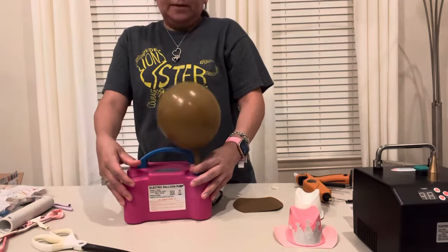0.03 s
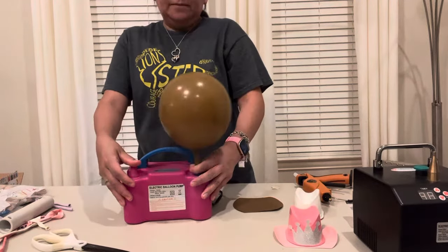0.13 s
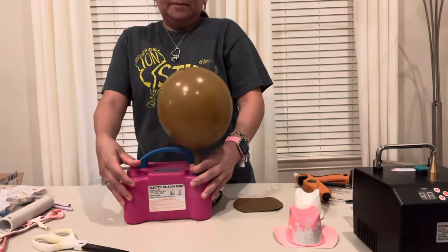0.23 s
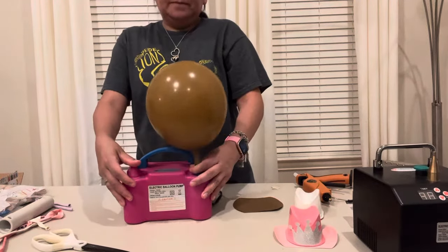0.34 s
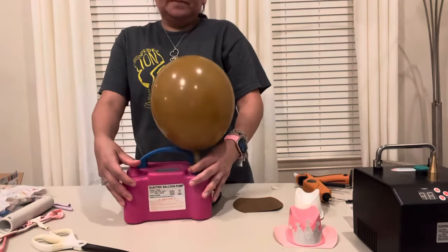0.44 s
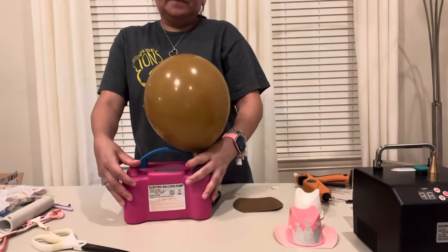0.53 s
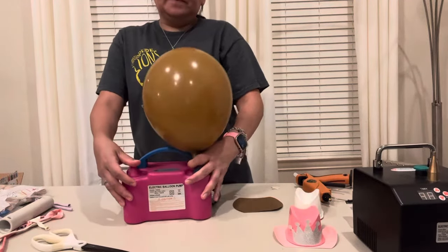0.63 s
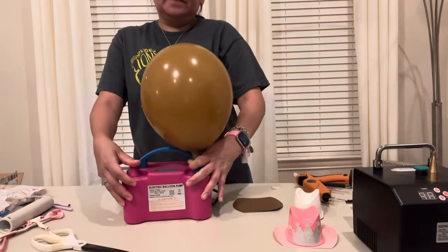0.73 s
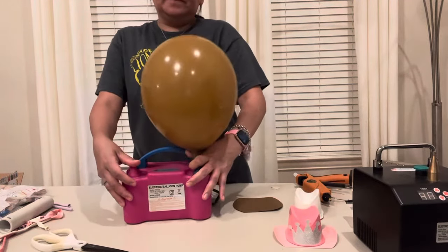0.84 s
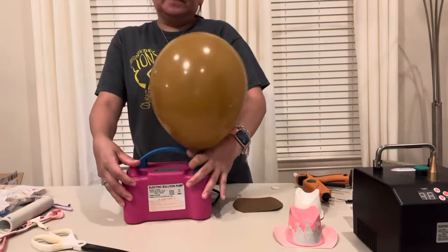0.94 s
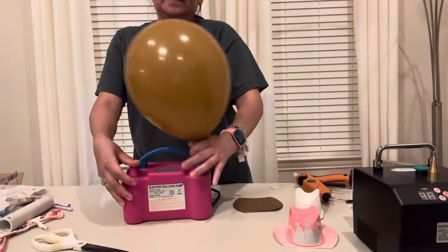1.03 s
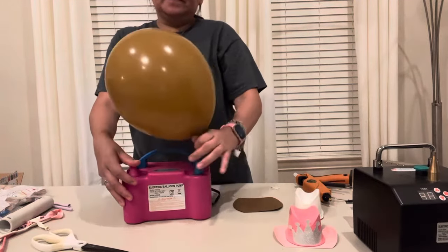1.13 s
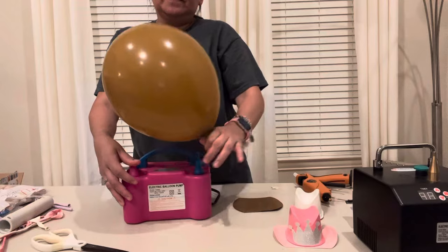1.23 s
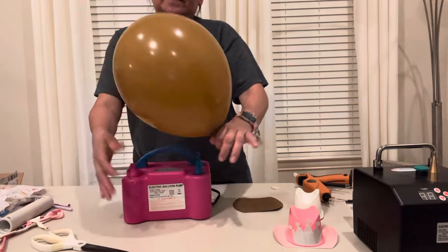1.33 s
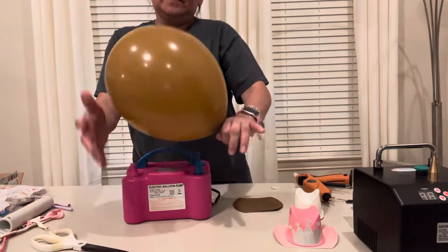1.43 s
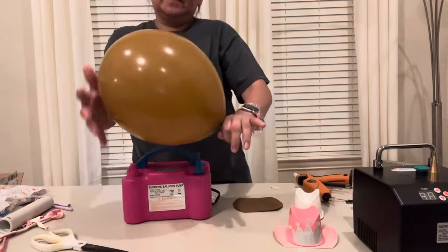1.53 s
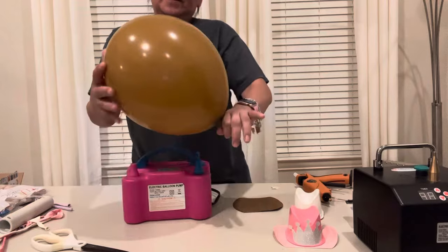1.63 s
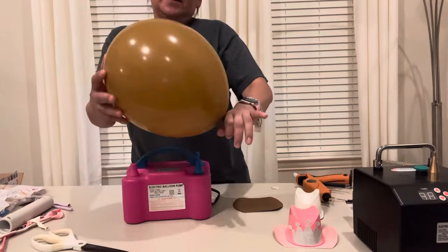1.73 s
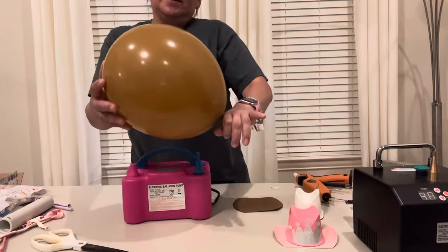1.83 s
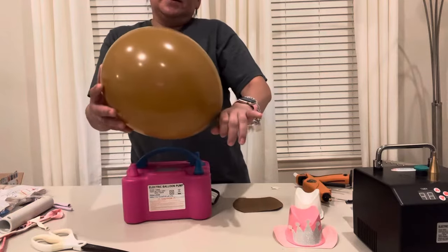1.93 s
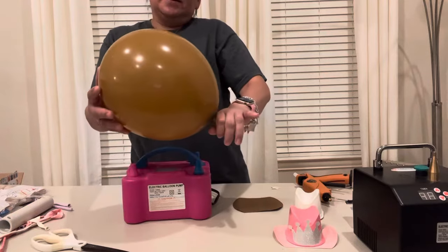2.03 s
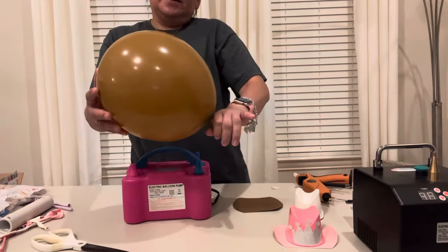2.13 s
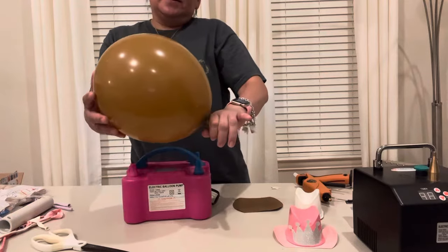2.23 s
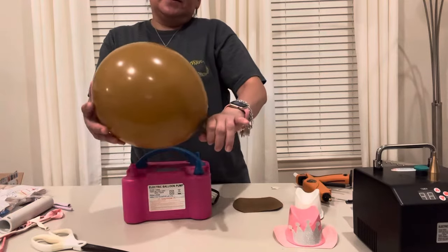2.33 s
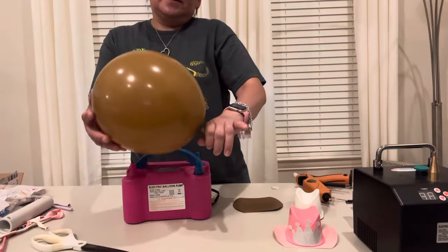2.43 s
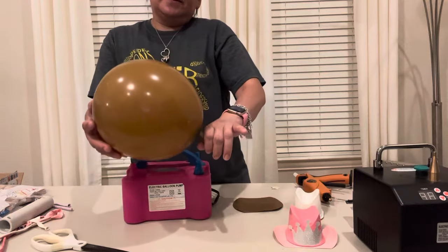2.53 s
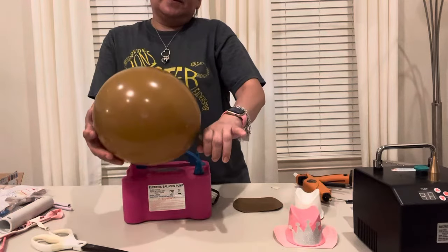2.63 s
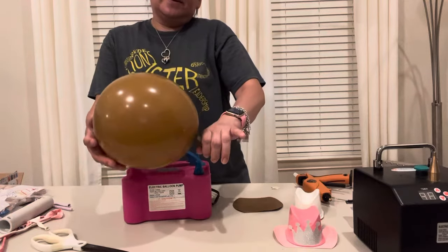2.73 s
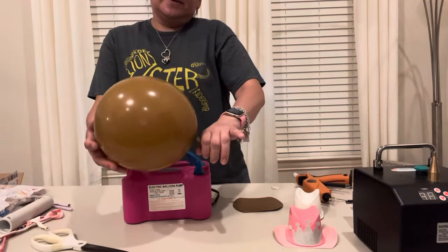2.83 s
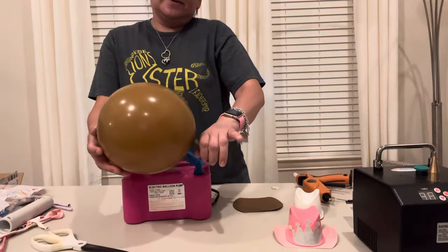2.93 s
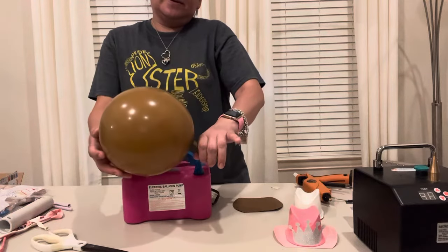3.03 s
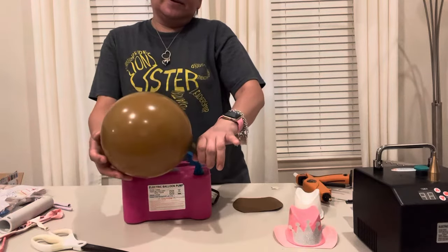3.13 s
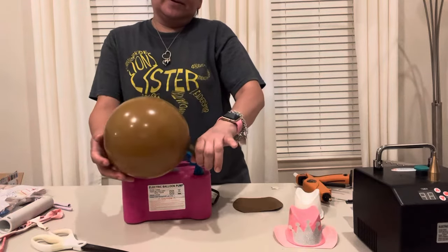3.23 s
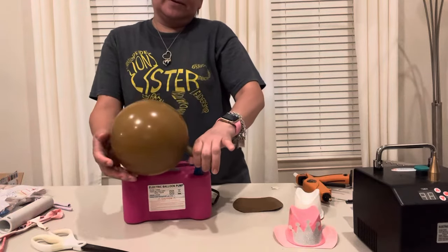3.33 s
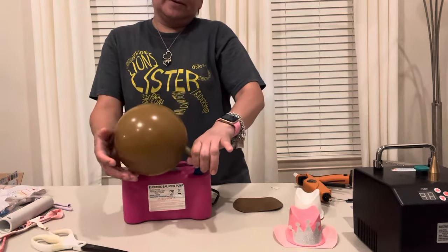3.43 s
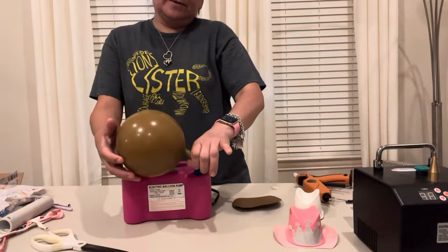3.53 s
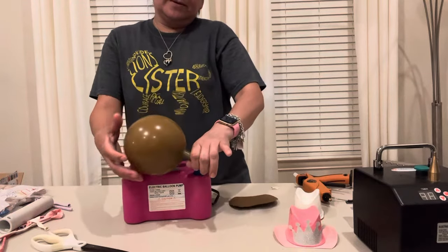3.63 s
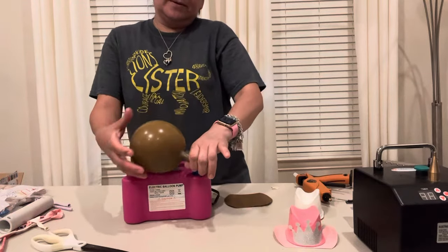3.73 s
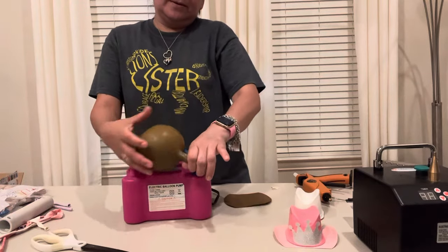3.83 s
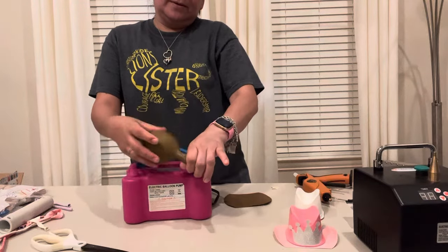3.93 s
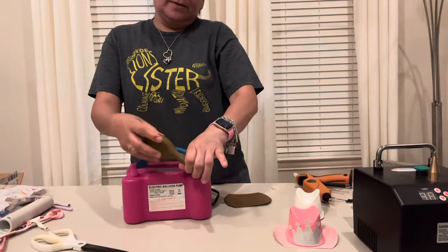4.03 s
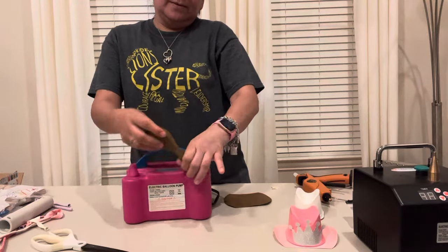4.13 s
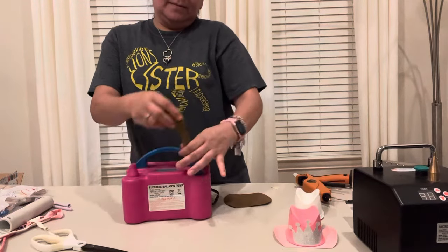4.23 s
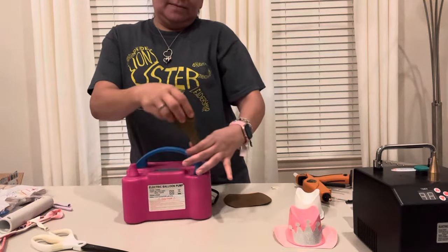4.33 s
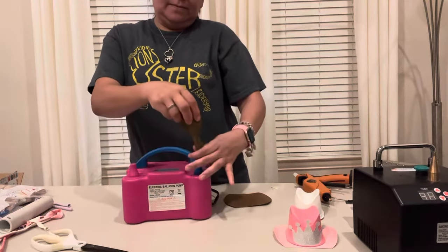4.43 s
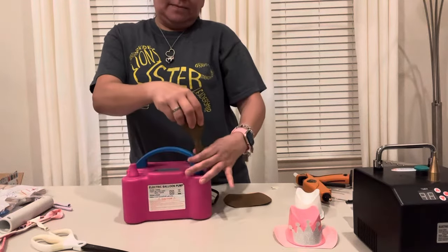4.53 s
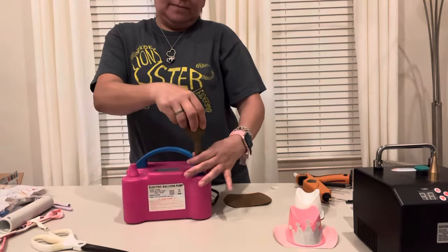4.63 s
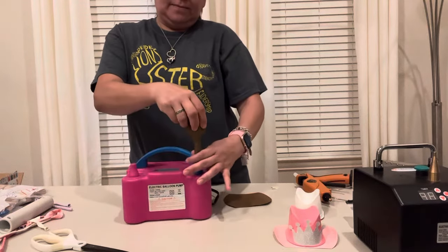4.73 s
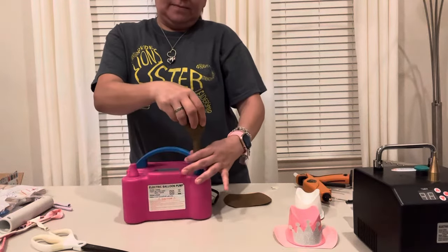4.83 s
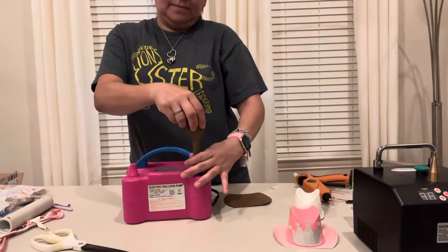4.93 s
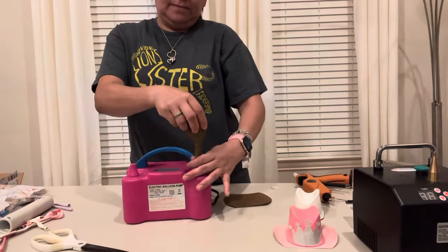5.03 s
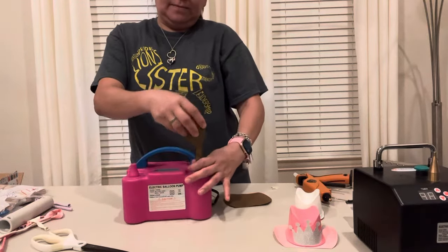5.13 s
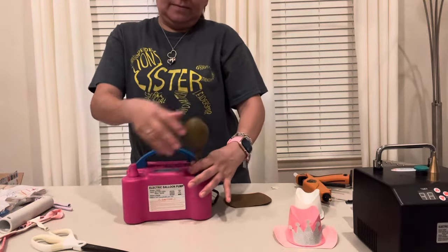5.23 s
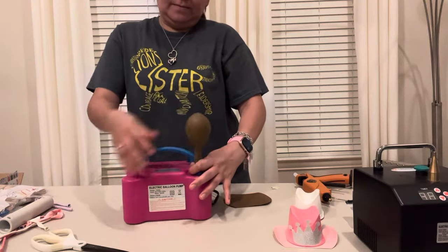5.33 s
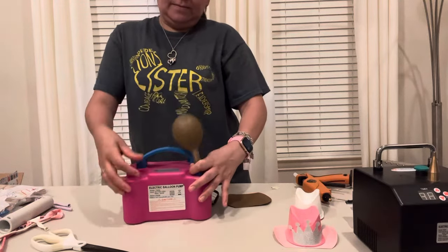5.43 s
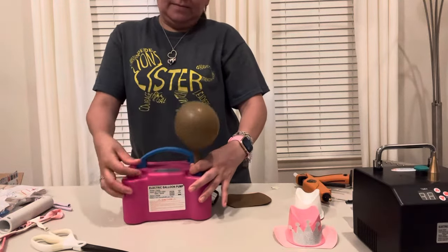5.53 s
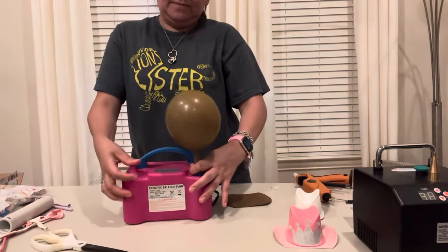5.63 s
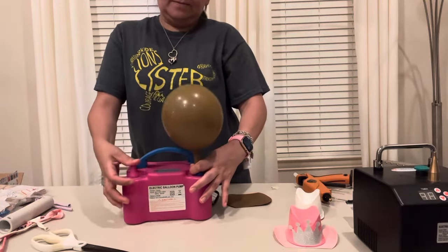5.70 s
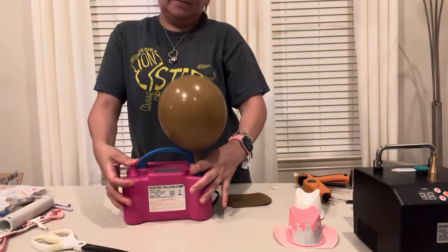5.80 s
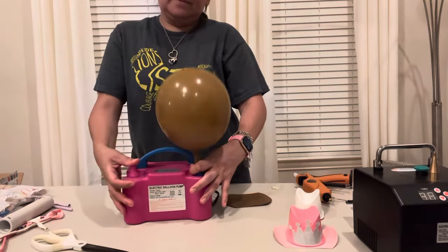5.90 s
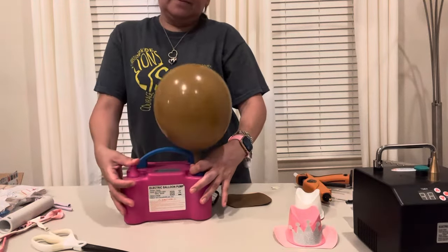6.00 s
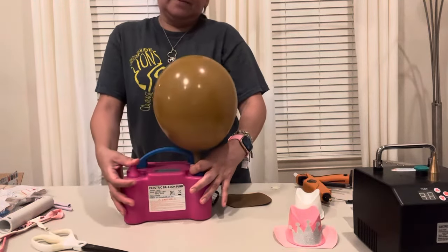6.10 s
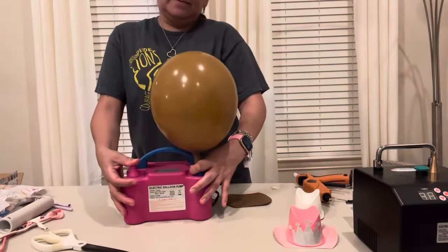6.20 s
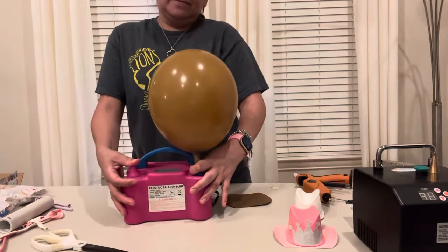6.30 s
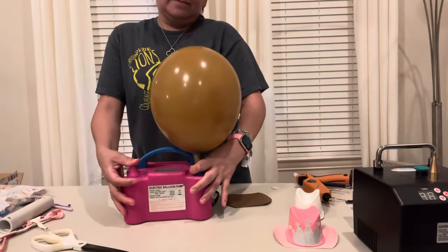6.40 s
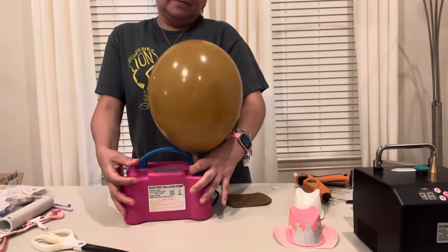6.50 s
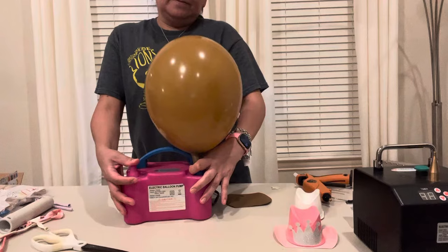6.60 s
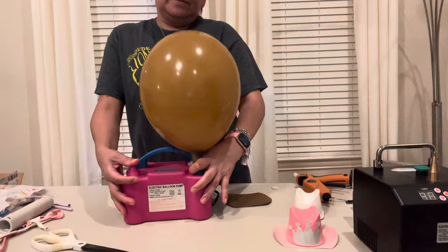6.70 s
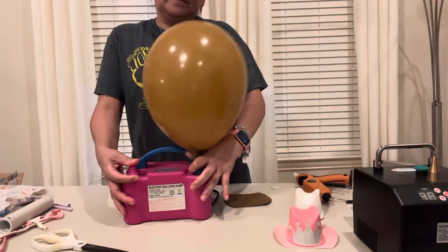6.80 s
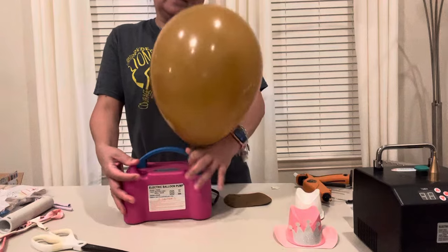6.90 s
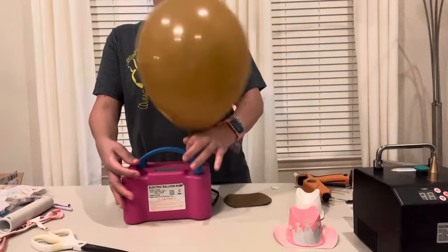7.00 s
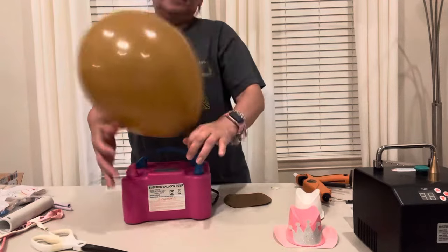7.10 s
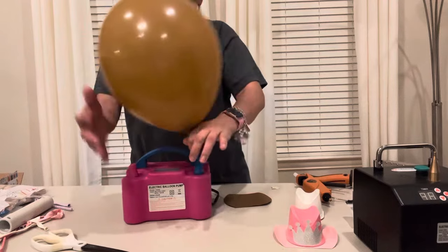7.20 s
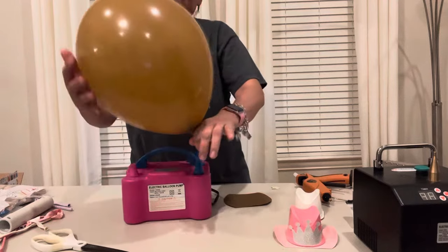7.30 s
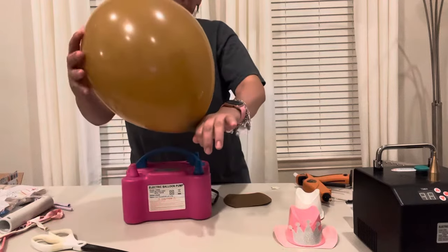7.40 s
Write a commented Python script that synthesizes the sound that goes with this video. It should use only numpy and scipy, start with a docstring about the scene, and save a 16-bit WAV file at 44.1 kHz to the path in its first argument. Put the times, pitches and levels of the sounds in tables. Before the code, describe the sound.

An electric pump whines and inflates a balloon; air rasps out of its fluttering neck, then the pump restarts and fills it again.

```python
"""In a curtained room, a mains-driven pump on a table blows up a balloon.
Its rotor whines, coasts down and is started again. Air roars in the casing and rushes through the
nozzle. Let go, the balloon empties through its fluttering rubber neck. The balloon also hoots, air
puffs from the neck, and hands bump softly against the table or the balloon."""
import sys
import numpy as np
from scipy import signal
from scipy.fft import rfft, irfft, next_fast_len
from scipy.io import wavfile
from scipy.ndimage import uniform_filter1d

SR = 44100
rng = np.random.default_rng(int(sys.argv[2]) if len(sys.argv) > 2 else 0)


def waveform_to_disk(signal):
    """Save audio, clipped to [-1, 1], as 16-bit WAV at the path in sys.argv[1]."""
    frames = np.transpose(np.atleast_2d(signal))
    scaled = np.clip(frames, -1, 1) * 32767
    samples = np.round(scaled).astype(np.int16)
    wavfile.write(sys.argv[1], SR, samples)


N = 328839
TIME = np.arange(N) / SR
# When the pump's switch is held. Each row: on and off time in seconds.
SWITCH_TIMES = [(-1, .461), (5.165, 6.847)]


def from_db(db):
    """Turn decibels into a gain."""
    return 10 ** (np.asarray(db) / 20)


def rms_one(x):
    """Scale a signal to an average strength (rms) of 1."""
    return x / np.sqrt(np.mean(x ** 2) + 1e-20)


def in_time(rows):
    """Join rows that begin with a time into one curve for each other column."""
    seconds, *columns = np.transpose(rows)
    return [np.interp(TIME, seconds, column) for column in columns]


def at_hz(points, hz):
    """Read a table of levels in dB at the given frequencies."""
    known_hz, db = np.transpose(points)
    return np.interp(np.log(hz), np.log(known_hz), db)


def gate(start, end, fade_s):
    """Fade in from the start, hold at 1, fade out to the end."""
    return np.clip(np.minimum(TIME - start, end - TIME) / fade_s, 0, 1)


def drift(rate_hz):
    """A smooth random wobble, about 1 in size."""
    steps = rng.standard_normal(int(N / SR * 200) + 2)
    pole = np.exp(-2 * np.pi * rate_hz / 200)
    slow = rms_one(signal.lfilter([1], [1, -2 * pole, pole * pole], steps))
    return np.interp(TIME * 200, np.arange(len(slow)), slow)


def tone(hz):
    """A sine wave that follows a pitch curve."""
    return np.sqrt(2) * np.sin(2 * np.pi * np.cumsum(hz) / SR + rng.uniform(0, 2 * np.pi))


def at_ports(x):
    """Sound reaches the microphone's left opening (port) two samples after the right."""
    return np.array([np.roll(x, 1), np.roll(x, -1)])


def shaped_noise(*spectra):
    """Noise coloured by tables of levels and by the ringing of the pump's casing."""
    # Casing resonances. Each row: centre in Hz, width in Hz, boost in dB.
    casing = [(750, 45, 3), (4730, 11, 8.5)]
    size = next_fast_len(N)
    hz = np.arange(size // 2 + 1) * SR / size + 1
    db = sum(at_hz(spectrum, hz) for spectrum in spectra)
    db += sum(boost / (1 + ((hz - centre) / width) ** 2) for centre, width, boost in casing)
    return irfft(rfft(rng.standard_normal(size)) * from_db(db), size)[:N]


def wide_noise(spectrum, flicker_db):
    """Stereo noise: direct sound plus a scattered part, opposite in left and right."""
    # Each row: frequency in Hz, scattered level in dB relative to direct.
    spread = [(60, -22.5), (380, -6.5), (2380, -3.5), (15000, -28)]
    direct, scattered = shaped_noise(spectrum), shaped_noise(spectrum, spread)
    stereo = (at_ports(direct) + scattered * [[1], [-1]]) / np.std(direct)
    return stereo * from_db(flicker_db * drift(20))


def turbulence(x, depth_db):
    """Swirling air swells and thins in patches of pitch and time."""
    patch_hz, patch_s = 260.7, .09
    spectrum = signal.stft(x, nperseg=1024)[2]
    patches = rng.standard_normal(spectrum.shape[-2:])
    for axis, cells in enumerate((patch_hz * 1024 / SR, patch_s * SR / 512)):
        patches = uniform_filter1d(uniform_filter1d(patches, int(cells), axis=axis), 3, axis=axis)
    return signal.istft(spectrum * from_db(depth_db * rms_one(patches)), nperseg=1024)[1][..., :N]


def still_room():
    """The faint, low noise of the room itself."""
    # Each row: frequency in Hz, relative level in dB.
    colour = [(30, -14), (65, -2.5), (108, -12.5), (230, -4), (724, -25), (1150, -30.5), (1450, -49),
              (8800, -41), (10000, -85)]
    return from_db(-61) * wide_noise(colour, flicker_db=0.94)


def room_echo(x):
    """Reflections blur into a short tail on each side, without deep bass."""
    t60_s = 0.58   # time to fade by 60 dB
    age = np.arange(int(.5 * SR)) / SR
    tail = rng.standard_normal((2, len(age))) * from_db(-60 * age / t60_s) * (age > .004)
    tail = signal.sosfilt(signal.butter(2, 350, "high", fs=SR, output="sos"), tail)
    tail /= np.sqrt(np.sum(tail ** 2, axis=1, keepdims=True))
    return from_db(-6) * signal.fftconvolve(x[None], tail, axes=1)[:, :N]


def hand_bumps():
    """Hands knock the table or balloon with soft, low thuds."""
    # Each row: start in seconds, level in dB, pitch in Hz.
    bumps = [(5.469, -32.5, 99), (7.105, -26, 60), (7.272, -27, 71)]
    out = np.zeros(N)
    for start, db, hz in bumps:
        age = np.clip(TIME - start, 0, 2)
        out += from_db(db - 60 * age / 0.15) * np.clip(age / 0.015, 0, 1) * np.sin(2 * np.pi * hz * age)
    return out


def puffs_and_click():
    """Sharp puffs of air from the neck, and a faint click as the pump is switched on."""
    # Each row: start in seconds, level in dB, centre in Hz, seconds to rise, seconds to fade by 60 dB.
    bursts = [(0.984, -16, 3940, 0.014, 0.33), (1.012, -24, 4200, 0.014, 0.32),
              (3.89, -33, 920, 0.022, 0.47), (5.167, -44, 928, 0.0025, 0.47),
              (6.881, -15.5, 4720, 0.008, 0.23), (6.897, -22, 3600, 0.0076, 0.47),
              (7.0, -25, 6000, 0.02, 0.15)]
    out = np.zeros((2, N))
    for start, db, hz, rise, t60 in bursts:
        age = np.clip(TIME - start, 0, 2)
        colour = [(hz / 9, -45), (hz / 2, -17), (hz / 1.11, -9), (hz, 0), (hz * 1.37, -8),
                  (8900, -14), (9900, -60)]
        fall_db = -60 * np.maximum(age - rise, 0) / t60
        body, snap = from_db(fall_db), from_db(-1.5 + fall_db / 0.3)
        out += from_db(db) * (body + snap) * np.clip(age / rise, 0, 1) ** 2 * wide_noise(colour, 0)
    return out


def neck_flutter():
    """Escaping air flaps the neck and rasps through it; a slack, low neck flaps more unevenly and rasps louder."""
    # One list for each flutter. Each row: time in seconds, pitch in Hz, level in dB.
    flutters = [
        [(1.69, 238.2, -33), (1.88, 248.6, -33), (1.94, 433, -24), (1.99, 447.5, -34), (2.035, 675, -52),
         (2.1, 656.5, -41.5), (2.26, 353.7, -30), (2.4, 347.5, -32.5), (2.53, 396.4, -32), (2.62, 362.5, -29)],
        [(2.82, 410.4, -36.5), (3.3, 396, -30)],
        [(3.895, 480, -37), (3.93, 400.6, -30), (4.0, 395.6, -46), (4.14, 400, -72)],
    ]
    # Each row: upper levels in dB of one flutter's second and third harmonic, before any boost.
    overtones = [(-41, -47), (-45, -53), (-44, -48)]
    # Each row: frequency in Hz, relative level in dB.
    rasp_colour = [(120, -34), (250, 13), (450, 8), (900, 8), (2000, -3), (3000, -46)]
    taut_hz, taut_boost_db = 520, 12   # above this pitch the taut neck brings out the third harmonic
    out, rasp = np.zeros(N), rms_one(shaped_noise(rasp_colour))
    for rows, limits_db in zip(flutters, overtones):
        hz, db = in_time(rows)
        uneven = np.clip(0.363 * (347 / hz) ** 0.82, 0, 1)
        phase = 2 * np.pi * np.cumsum(hz * (1 + (.014 + .055 * uneven) * drift(40))) / SR
        levels = [db, *(np.minimum(limit, db + 5) for limit in limits_db)]
        levels[2] += taut_boost_db * np.clip(2 * (hz / taut_hz - 1), 0, 1)
        flaps = sum(from_db(level + (3.5 + 3 * uneven) * drift(45)) * np.sin(k * phase)
                    for k, level in enumerate(levels, 1))
        rasp_part = uneven * rasp * from_db(np.minimum(db, -33))
        out += gate(rows[0][0], rows[-1][0], 0.0095) * (flaps + rasp_part)
    return out


def balloon_hoots():
    """The balloon's skin sounds short, wavering notes."""
    # Each row: start in seconds, length in seconds, pitch in Hz, level in dB.
    hoots = [(0.11, 0.062, 311, -27.5), (0.374, 0.15, 372, -32), (3.661, 0.12, 345, -46),
             (5.926, 0.13, 442.1, -33.5), (6.15, 0.13, 462, -27.5), (6.53, 0.18, 531.4, -30.5)]
    out = np.zeros(N)
    for start, length, hz, db in hoots:
        swell = from_db(db + 3 * drift(20)) * gate(start, start + length, 0.031)
        out += swell * tone(hz * (1 + 0.014 * drift(32)))
    return out


def noise_band(hz, width_hz=450):
    """A narrow band of noise around a moving centre."""
    slow = signal.sosfilt(signal.butter(2, width_hz / 2, fs=SR, output="sos"), rng.standard_normal((2, N)))
    phase = 2 * np.pi * np.cumsum(hz) / SR
    return rms_one(slow[0] * np.cos(phase) + slow[1] * np.sin(phase))


def inlet_whistle():
    """Air entering the balloon stirs two breathy resonances of nozzle and neck."""
    # One list for each fill. Each row: time in seconds, low pitch in Hz, its level in dB,
    # high pitch in Hz, its level in dB.
    whistles = [
        [(0.0, 2689, -32, 4000, -32), (0.25, 2500, -30, 4050, -25), (0.45, 3000, -25, 4250, -25.5),
         (0.8, 2970, -44, 4207, -39)],
        [(5.6, 3150, -25, 4350, -32), (5.69, 2650, -27, 4163, -22.5), (5.86, 2800, -25.5, 3874, -23),
         (6.1, 3050, -26, 4240, -21.5), (6.22, 3000, -34, 4210, -28), (6.38, 3500, -29.5, 4335, -20),
         (6.75, 3400, -44, 4364, -34)],
    ]
    low_hz, low_db, high_hz, high_db = in_time([*whistles[0], *whistles[1]])
    filling = gate(-1, 0.96, 0.25) + gate(5.55, 6.85, 0.049)
    low = from_db(low_db + 2 * drift(2.1)) * noise_band(low_hz + 40 * drift(6.6))
    high = from_db(high_db + 2 * drift(9.6)) * noise_band(high_hz + 60 * drift(8))
    return filling * turbulence(low + high, depth_db=2.2)


def air_gains(speed):
    """How strong roar, rush, hiss and jet are: the powers of fan, filling and leak add up."""
    covered = gate(0, 0.984, 0.11) + gate(7, 6.89, 0.11)   # the neck muffles the nozzle
    roar, jet, hiss = (from_db(db + db_per_tenfold * np.log10(speed / 700) - 15.5 * covered) ** 2
                       for db, db_per_tenfold in [(-40.5, 27.5), (-29.5, 43), (-28, 47.5)])
    # Air driven in, one list for each fill. Each row: time in seconds, rush in dB, roar in dB.
    fills = [
        [(0, -19, -28.5), (.39, -18, -30.5), (.65, -25.5, -31), (1.0, -39.5, -33.5), (1.22, -37.5, -41)],
        [(5.22, -67, -40), (5.32, -27.5, -36), (5.44, -22, -35), (5.48, -35.5, -25.5), (5.63, -19.5, -30),
         (6.11, -21.5, -33), (6.55, -27.5, -36.5), (6.89, -28.5, -33)],
    ]
    rush = np.zeros(N)
    for rows in fills:
        rush_db, roar_db = in_time(rows)
        hiss_db = -30 + 0.99 * (rush_db + 20.5)
        filling = gate(rows[0][0] - .05, rows[-1][0] + 0.23, np.where(TIME < rows[1][0], .05, .25))
        roar += (filling * from_db(roar_db)) ** 2
        rush += (filling * from_db(rush_db)) ** 2
        hiss += (filling * from_db(hiss_db)) ** 2
    # Fingers let air out of the neck. Each row: time in seconds, jet in dB, hiss in dB.
    leak = [(1.641, -32, -38.5), (2.55, -32.5, -39), (2.66, -36.5, -43.5), (3.2, -30.5, -38),
            (3.33, -34.5, -44.5), (3.7, -34.5, -39.5), (3.83, -34, -35), (3.935, -27, -33)]
    jet_db, hiss_db = in_time(leak)
    after = np.maximum(TIME - leak[-1][0], 0)
    slow_tail = from_db(-25 - 60 * after)
    leaking = np.clip((TIME - leak[0][0]) / 0.019, 0, 1) * (from_db(-60 * after / 0.19) + slow_tail)
    roar += (leaking * from_db(jet_db - 15.5)) ** 2
    jet += (leaking * from_db(jet_db)) ** 2
    hiss += (leaking * from_db(hiss_db)) ** 2
    return np.sqrt([roar, rush, hiss, jet])


def moving_air(speed):
    """Air roars in the casing, rushes into the balloon, and jets and hisses out of neck or nozzle."""
    # The colours of these noises. Each row: frequency in Hz, relative level in dB.
    roar_colour = [(40, -31.5), (156, -6.5), (303, -3.5), (724, 1), (1000, -1), (1250, -6), (1690, -13),
                   (2500, -17.5), (4000, -74)]
    rush_colour = [(900, -27.5), (1500, -9), (3440, -1.5), (5300, -6), (7000, -5), (9500, -58.5)]
    jet_colour = [(900, -29.5), (1400, -12.5), (2000, -10), (2800, -8), (3850, -5), (4180, 1), (4600, -3),
                  (5000, -6.5), (7000, -2.5), (9500, -55.5)]
    hiss_in_step = [(2350, -32), (4300, -9.5), (8530, 5.5), (9030, -1), (10400, -65.5), (13500, -35),
                    (13900, -7), (15800, -7)]
    hiss_opposed = [(2350, -28), (4000, -23), (8480, 3), (9560, 0.5), (14400, -10), (15800, -23)]
    roar, rush, hiss, jet = air_gains(speed)
    in_step = rms_one(shaped_noise(hiss_in_step))
    # From about 10 to 13 kHz the hiss is wide, opposite in left and right.
    opposed = from_db(3.5) * rms_one(shaped_noise(hiss_opposed)) * [[1], [-1]]
    out = roar * from_db(3.5) * turbulence(wide_noise(roar_colour, flicker_db=2), depth_db=2)
    out += rush * turbulence(wide_noise(rush_colour, flicker_db=0.85), depth_db=2.5)
    out += jet * turbulence(wide_noise(jet_colour, flicker_db=1), depth_db=1.1)
    return out + hiss * (in_step + opposed) * from_db(1.75 * drift(10))


def rotor_speed():
    """Turns per second: the motor pulls the rotor on, friction and air drag hold it back."""
    step_s, speed, half_pull_speed = .004, 649, 302.3
    full_pull, friction, relief = 4400, 46.5, 104.5   # turns per second gained or lost each second
    times = np.arange(0, N / SR + step_s, step_s)
    switch = sum(np.clip(np.minimum(times - on, off - times) / step_s, 0, 1) for on, off in SWITCH_TIMES)
    # The full balloon stalls the air and eases the drag.
    easing = relief * np.clip(np.minimum(times - .53, 1.17 - times) / .1, 0, 1)
    speeds = []
    for powered, eased in zip(switch, easing):
        speeds.append(speed)
        pull = powered * full_pull / (1 + (speed / half_pull_speed) ** 2.133)
        drag = .001091 * speed ** 2
        speed += step_s * (pull + eased - friction - drag)
    return np.interp(TIME, times, speeds)


def rotor_shake(speed):
    """The unbalanced rotor shakes casing and table once per turn."""
    # The tone while coasting and under power. Each row: turns per second, level in dB.
    coasting_levels = [(55, -71.5), (94, -60), (118, -66), (140, -46.5), (215, -39), (285, -45), (310, -50),
                       (340, -59), (365, -41), (440, -33.5), (580, -28), (720, -28.5)]
    powered_levels = [(250, -62), (350, -40), (540, -24), (645, -14.5), (688, -24.5), (699, -29),
                      (708, -25), (722, -26.5)]
    # The room's standing waves tip it sideways. Each row: turns per second, left minus right in dB.
    balance = [(450, 2), (675, 6), (698, -3), (720, -7.5)]
    powered = sum(gate(on, off + 0.06, 0.023) for on, off in SWITCH_TIMES)
    db = powered * at_hz(powered_levels, speed) + (1 - powered) * at_hz(coasting_levels, speed)
    shake = from_db(db + 1.8 * drift(12)) * tone(speed + 1.6 * drift(13))
    return at_ports(shake) * from_db(at_hz(balance, speed) / 2 * [[1], [-1]])


def motor_whine(speed):
    """Whines follow the rotor's speed; while coasting, faint ones swell at casing resonances."""
    # Each row: multiple of the speed, level in dB, turns per second at which it is loudest.
    powered_whines = [(1.831, -42, 716), (2.0, -36, 698), (2.999, -40, 700)]
    # Each row: multiple of the speed, level in dB, resonance in Hz, its width as a fraction.
    coasting_whines = [(7.05, -50, 3400, .06), (46.5, -85, 3400, .1), (69, -76, 5900, .12),
                       (91, -82, 6800, .16)]
    powered = sum(gate(on, off + 0.053, 0.023) for on, off in SWITCH_TIMES)
    out = np.zeros(N)
    for multiple, db, loudest in powered_whines:
        swell_db = -2.5 * (np.log(speed / loudest) / 0.039) ** 2 + 2.5 * drift(13)
        out += powered * from_db(db + swell_db) * tone(multiple * speed + 7 * drift(25))
    for multiple, db, resonance_hz, width in coasting_whines:
        hz = multiple * speed
        swell_db = -3 * (np.log(hz / resonance_hz) / width) ** 2 + 4.5 * drift(12)
        out += (1 - powered) * from_db(db + swell_db) * tone(np.minimum(hz, 12000) + 60 * drift(40))
    return out


def motor_buzz(speed):
    """The current hums; at the restart it surges and the spinning contact bars (commutator) sing."""
    # The song of the bars. Each row: frequency in Hz, level in dB.
    bar_levels = [(1540, -38.5), (3220, -36), (3750, -20.5), (4370, -30.5), (5300, -42)]
    bar_count, pulse_hz = 12, 120   # the pull peaks twice in each mains cycle
    restart = SWITCH_TIMES[1][0]
    powered = sum(gate(on, off, 0.025) for on, off in SWITCH_TIMES)
    hum_db = np.maximum(-29 - 58 * np.abs(TIME - restart - .07), -55.5)
    hum = powered * from_db(hum_db) * tone(np.full(N, pulse_hz))
    hz = bar_count * speed
    current = 1 + 0.86 * np.cos(2 * np.pi * pulse_hz * (TIME - 5.255))
    octave_db = -41 - 600 * np.abs(TIME - restart - .032)
    octave = from_db(octave_db) * gate(restart + .015, restart + .075, .01) * tone(2 * hz)
    song = from_db(at_hz(bar_levels, hz)) * gate(restart + 0.022, restart + .4, 0.0082) * tone(hz)
    return hum + current * (song + octave)


def scene():
    """Pump and balloon in front of the microphone."""
    speed = rotor_speed()
    tones = motor_whine(speed) + motor_buzz(speed) + neck_flutter() + balloon_hoots() + inlet_whistle()
    out = still_room() + room_echo(tones) + at_ports(tones)
    return out + rotor_shake(speed) + moving_air(speed) + puffs_and_click() + hand_bumps()


def record(dry):
    """Cut the deep bass and the highest treble."""
    dry = signal.sosfilt(signal.butter(2, 40, "high", fs=SR, output="sos"), dry)
    return signal.sosfilt(signal.cheby2(18, 70, 15950, fs=SR, output="sos"), dry)


dry = scene()
out = record(dry)
waveform_to_disk(out)
```